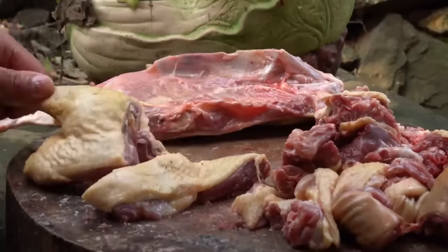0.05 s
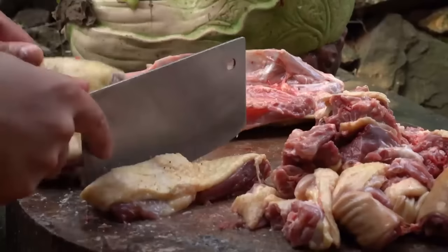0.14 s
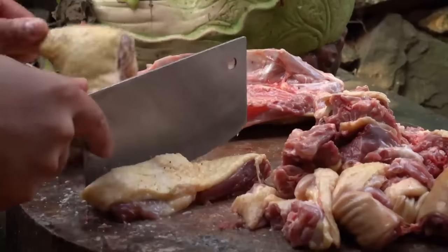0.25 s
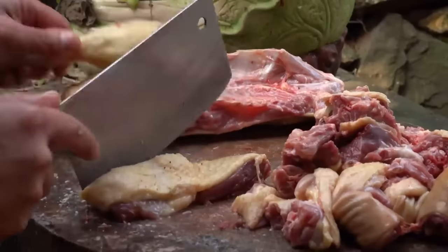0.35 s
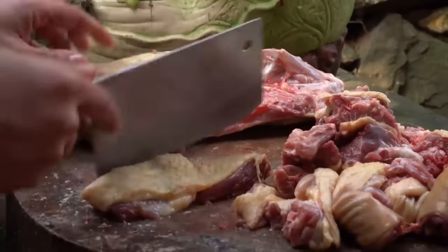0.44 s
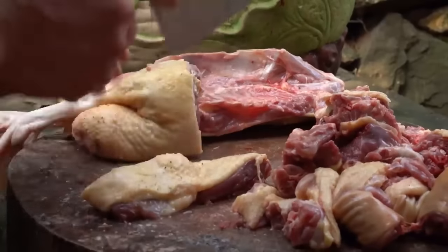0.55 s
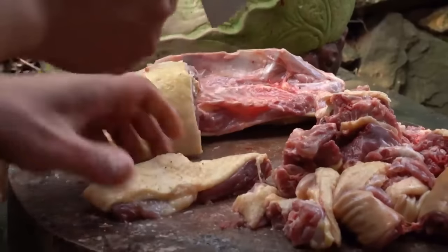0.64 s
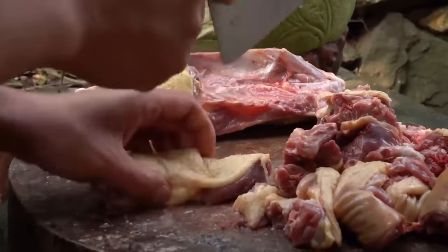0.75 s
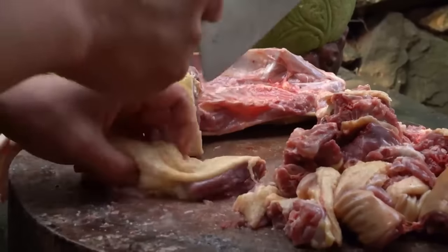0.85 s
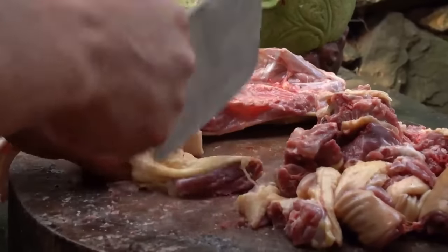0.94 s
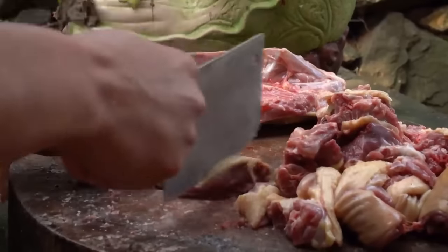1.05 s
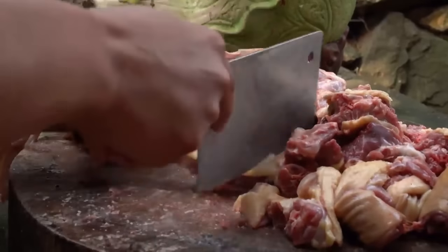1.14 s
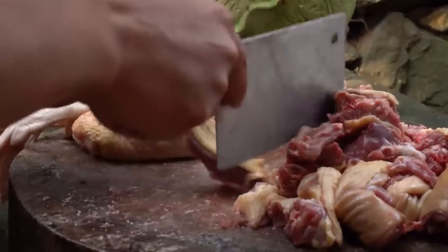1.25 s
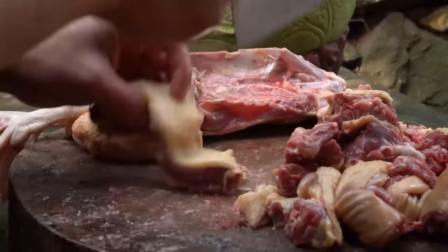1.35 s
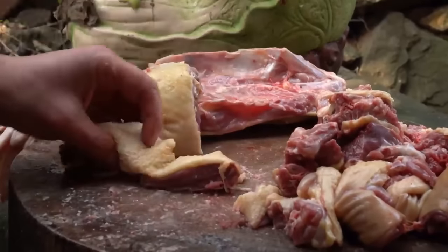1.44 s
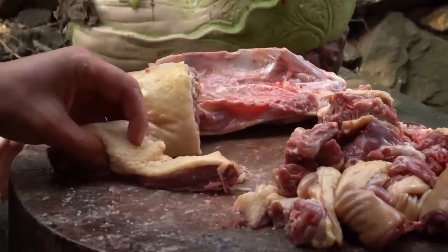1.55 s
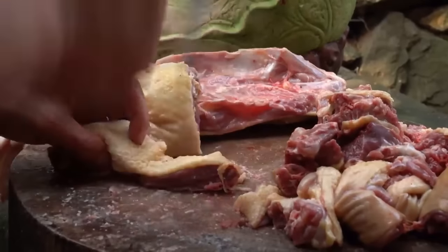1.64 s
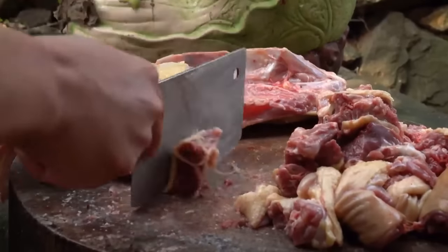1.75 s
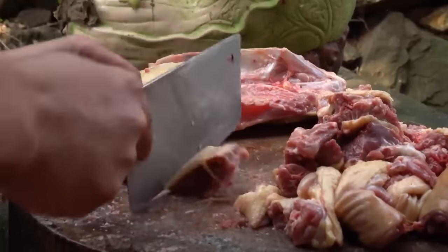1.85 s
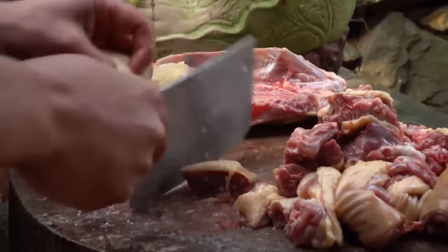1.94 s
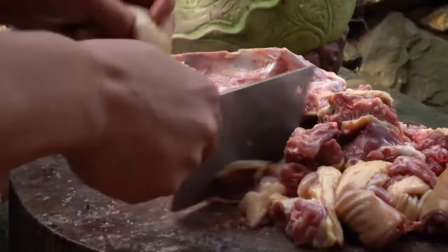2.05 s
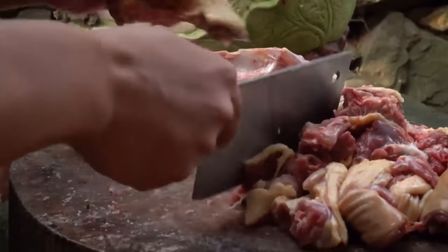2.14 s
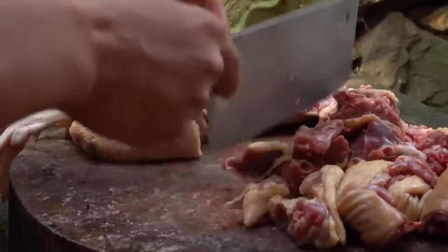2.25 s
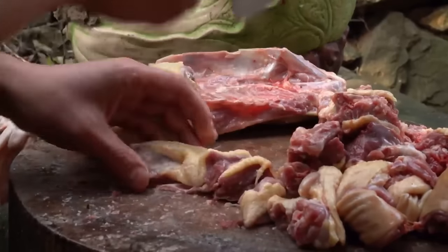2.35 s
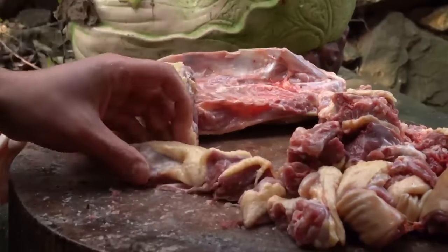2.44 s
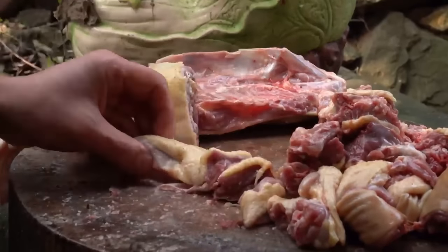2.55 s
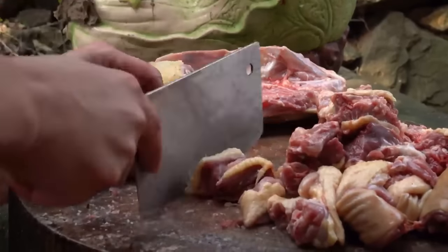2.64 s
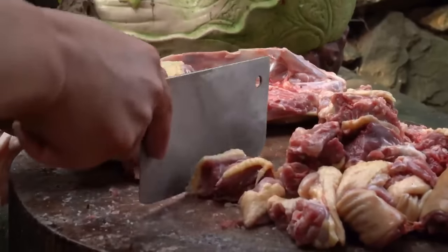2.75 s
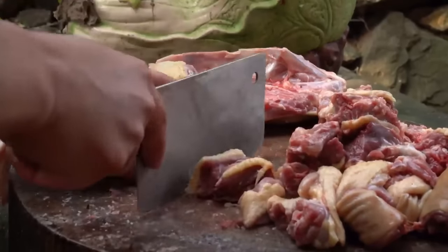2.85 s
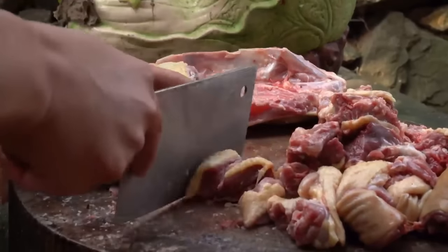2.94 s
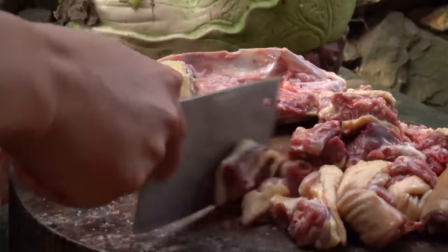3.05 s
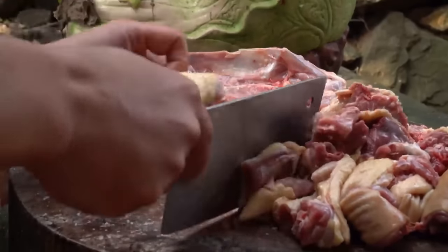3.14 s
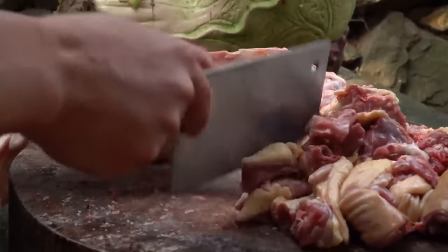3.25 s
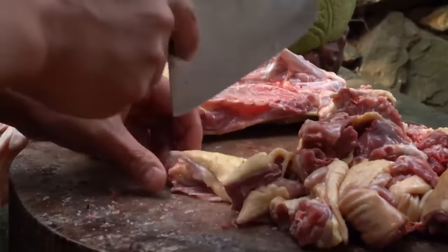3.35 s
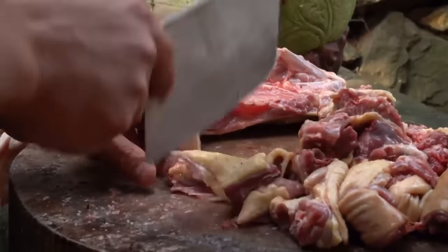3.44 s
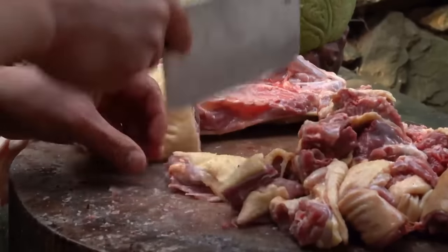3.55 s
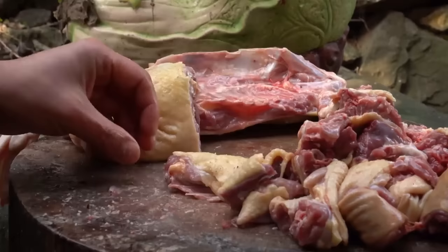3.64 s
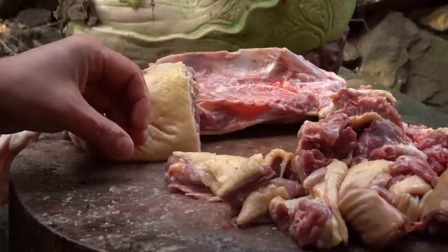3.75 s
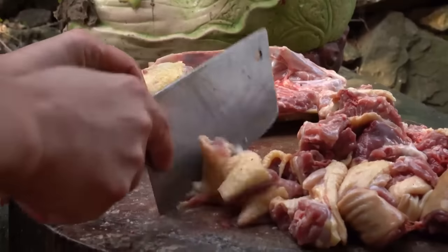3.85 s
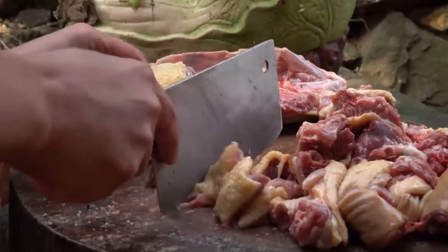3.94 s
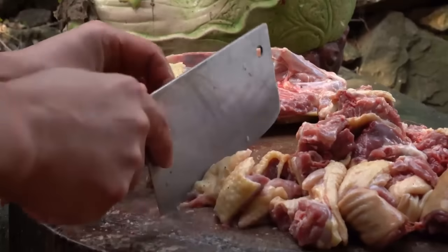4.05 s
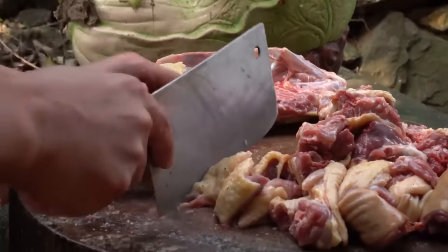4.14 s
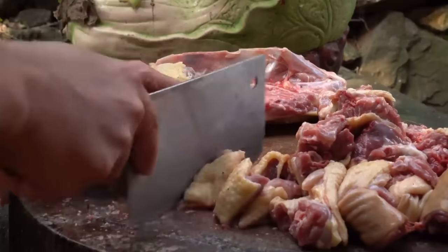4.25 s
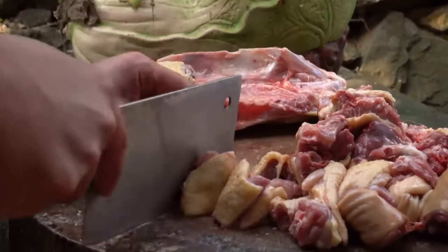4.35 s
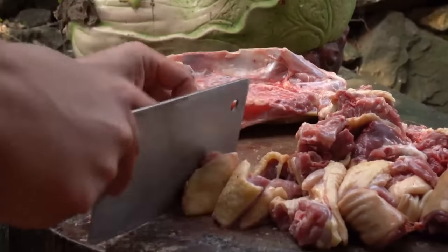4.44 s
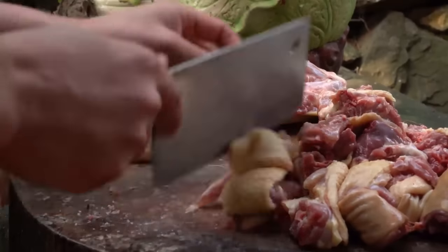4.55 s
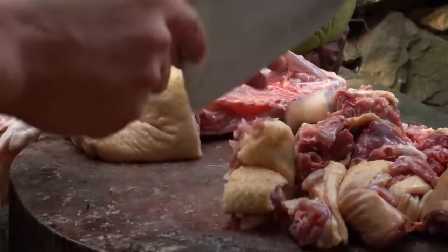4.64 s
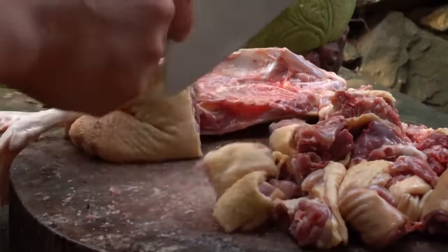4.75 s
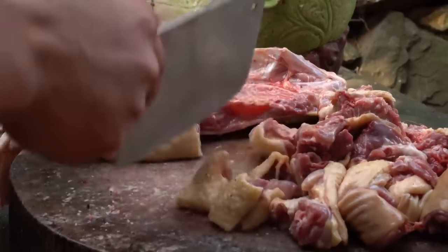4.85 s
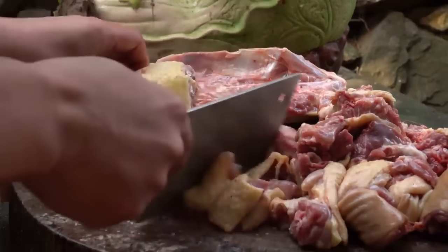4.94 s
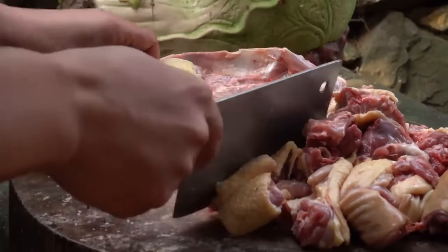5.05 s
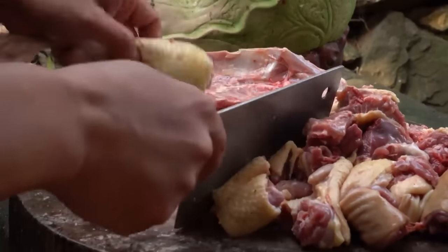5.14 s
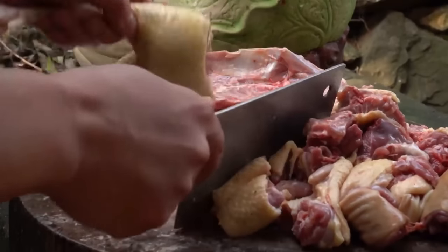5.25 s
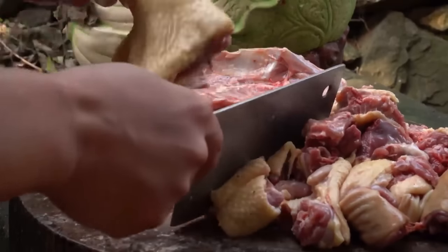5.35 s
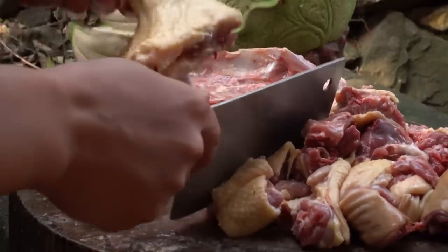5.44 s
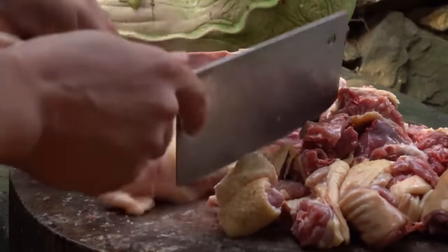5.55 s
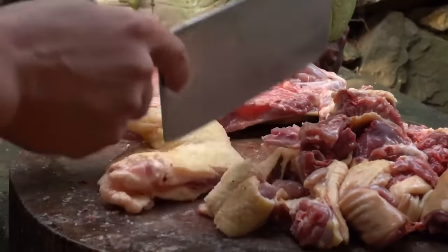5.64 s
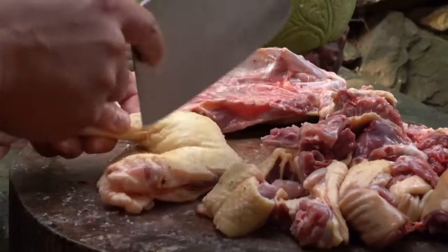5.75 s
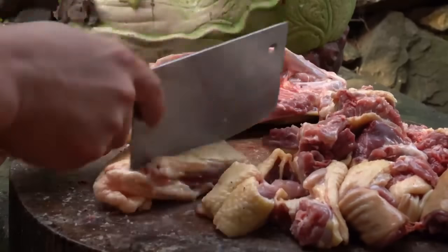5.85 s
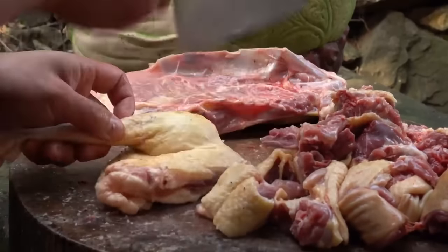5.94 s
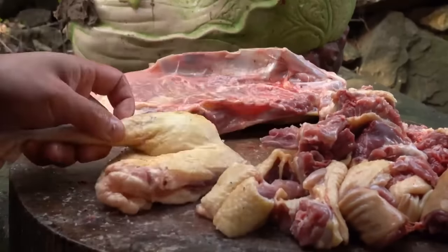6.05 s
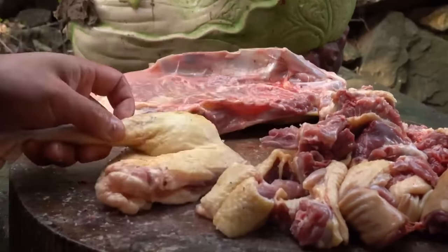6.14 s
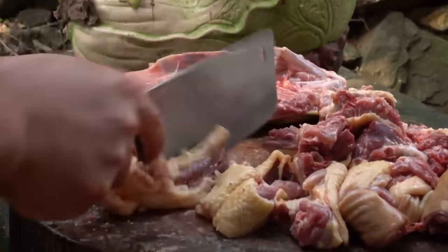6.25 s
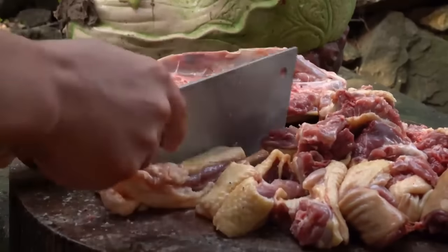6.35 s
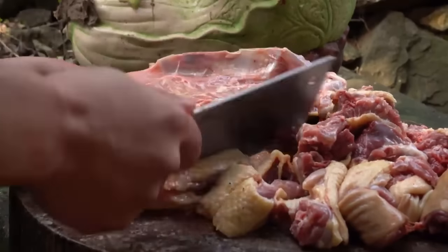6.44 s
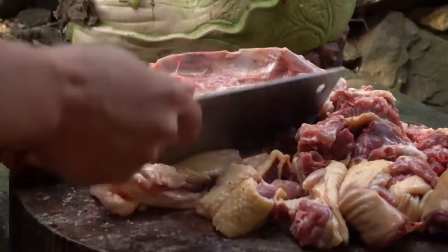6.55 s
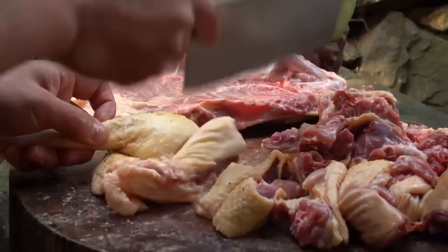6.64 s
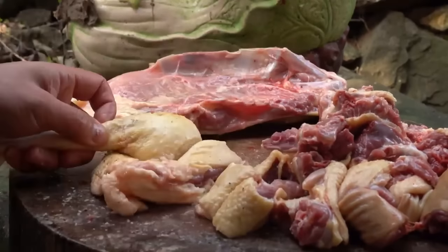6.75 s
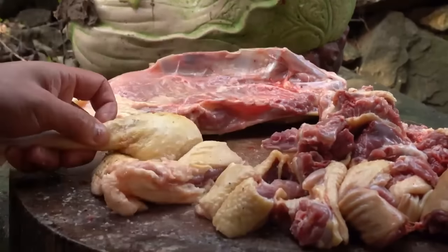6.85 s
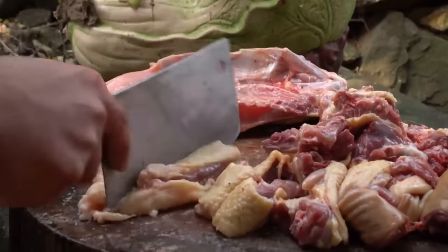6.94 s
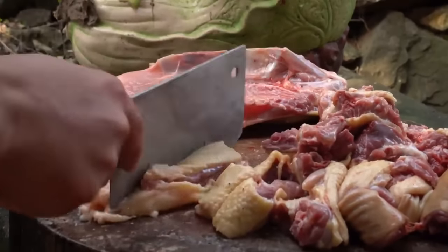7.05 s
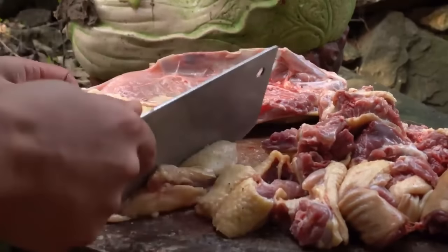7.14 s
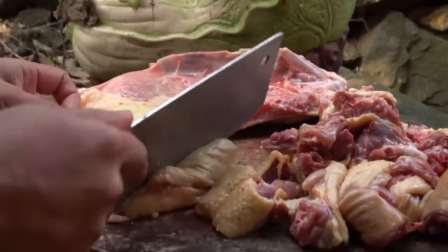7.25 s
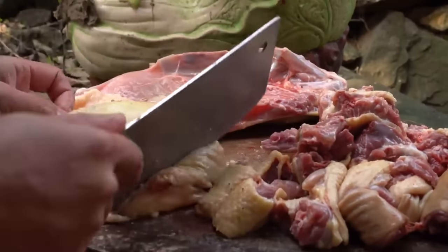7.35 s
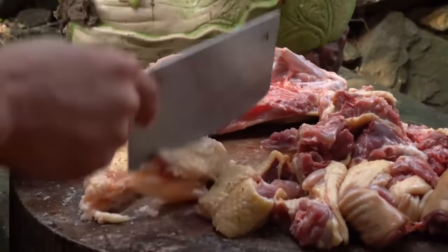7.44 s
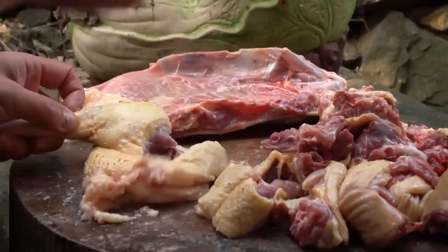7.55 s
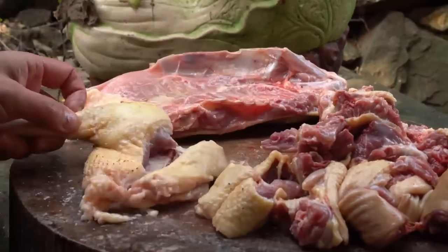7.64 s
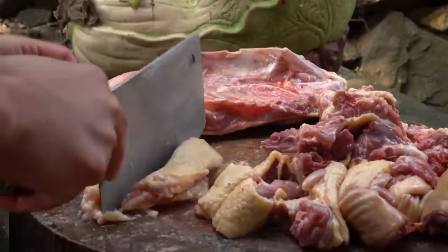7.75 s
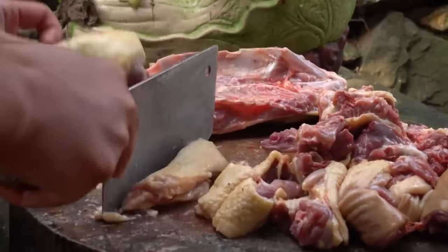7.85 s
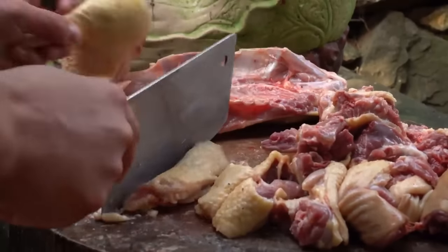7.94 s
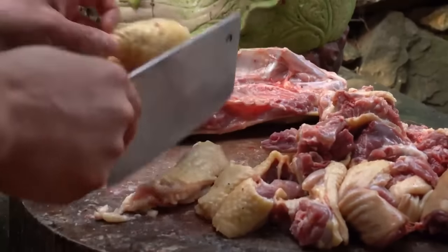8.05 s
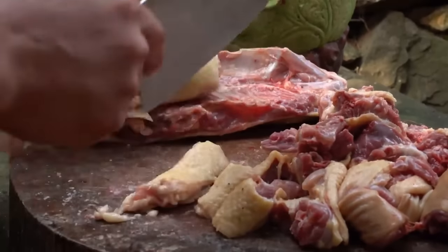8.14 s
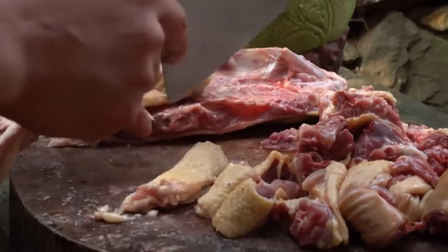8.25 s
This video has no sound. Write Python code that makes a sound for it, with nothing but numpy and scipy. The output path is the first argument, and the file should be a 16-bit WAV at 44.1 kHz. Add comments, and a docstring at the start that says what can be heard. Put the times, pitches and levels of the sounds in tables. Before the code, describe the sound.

Quiet open-air murmur and a thin wet sizzle lead into a bone-crunching cleaver chop at 0.2 s, the sizzle fading afterwards. A lighter squelching knock at 1.3 s leaves a faint metal ring. Hard chops land at 1.8 and 2.7 s, deep in the wooden block, the stuck blade singing around 1260 Hz for about half a second; a wet rasp at 2.1 s and a tiny squeak at 3.0 s fall between. Another crisp chop cracks at 3.9 s, then a wet slide at 4.4 s and a weak ticking hit at 5.0 s. Taps and squelches at 5.7 and 6.0 s precede chops at 6.35, 7.0 and 7.8 s, the 7.0 s one ringing brightest. Faint falling chirps appear near 1.5, 3.5, 4.1, 4.5, 6.5 and 8.2 s. Close stereo, slightly right, with short stone-wall echoes.

```python
"""Open-air murmur and a thin wet sizzle lead at once into the first chop of a heavy cleaver through a duck.
Bone fractures crunch as clusters of noise grains; the round wooden block thuds and hums in damped modes.
The blade sings sine notes; rasps, pops, squelches, ticks and low thumps are shaped noise or small resonances.
Stone walls answer with a scattered echo, faint chirps come by way of them, and a limiter flattens hard blows."""
import sys
import numpy as np
from scipy import signal
from scipy.fft import rfft, irfft, next_fast_len
from scipy.io import wavfile
from scipy.ndimage import uniform_filter1d, minimum_filter1d

SR = 44100
rng = np.random.default_rng(int(sys.argv[2]) if len(sys.argv) > 2 else 0)


def pcm_store(signal):
    """Save signal as 16-bit PCM."""
    levels = np.round(np.clip(np.atleast_2d(signal), -1, 1) * 32767)
    wavfile.write(sys.argv[1], SR, levels.astype(np.int16).T)


N = 366471
TIME = np.arange(N) / SR
AFTER = TIME[:SR]  # the second that follows a contact


def amp(db):
    """Decibels to gain."""
    return 10 ** (np.asarray(db) / 20)


def at_hz(points, hz):
    """Read a spectrum on a log-frequency axis."""
    point_hz, value = np.transpose(points)
    return np.interp(np.log(np.maximum(hz, 1)), np.log(point_hz), value)


def in_time(rows):
    """Gain of a level curve at every sample."""
    return amp(np.interp(TIME, *np.transpose(rows)))


def add(out, s, sound):
    """Mix a sound in at time s."""
    start = round(s * SR)
    n = min(sound.shape[-1], N - start)
    out[:, start:start + n] += sound[..., :n]


def burst(x, db):
    """Scale a short sound to the energy of 10 ms at this rms level."""
    energy = np.sum(np.atleast_2d(x) ** 2, axis=-1).mean()
    return x * amp(db) / np.sqrt(energy * 100 / SR)


def low_pass(x, hz, order=2):
    """Causal Butterworth low-pass."""
    return signal.sosfilt(signal.butter(order, min(hz, .45 * SR), fs=SR, output="sos"), x)


def high_pass(x, hz):
    """Causal Butterworth high-pass."""
    return signal.sosfilt(signal.butter(2, hz, "high", fs=SR, output="sos"), x)


def panned(x, db):
    """Lean a sound to the right: the right channel gains db against the left."""
    return x * amp([[-db / 2], [db / 2]])


def stereo_noise(n, colour, side_db, grain_db=0):
    """Noise of rms 1 with colour(Hz) in dB, in grains of uneven size; the two sides differ mostly in the treble."""
    size = next_fast_len(n)
    hz = np.arange(size // 2 + 1) * SR / size
    grain_sizes = np.clip(rng.standard_normal(size // 32 + 1), -2.5, 2.5)
    grains = amp(grain_db * np.repeat(grain_sizes, 32)[:size])
    spectra = rfft(rng.standard_normal((2, size)) * grains) * amp(colour(hz))
    side_gain = amp(side_db) * (hz + 100) / np.hypot(hz, 1100)
    mid, side = irfft(spectra * [np.ones_like(hz), side_gain], size)[:, :n]
    pair = np.array([mid + side, mid - side])
    return pair / pair.std()


def ring(hz, t60, delay=0, size=SR):
    """A struck mode: a sine that falls 60 dB in t60 seconds."""
    t = np.maximum(AFTER[:size] - delay, 0)
    return np.sin(2 * np.pi * hz * t) * amp(-60 * t / t60)


def crunch(colour, length, grain_db, side_db=-1):
    """A cluster of tiny fractures that swells quickly and dies away."""
    t = AFTER[:SR // 5] / length
    return stereo_noise(len(t), colour, side_db, grain_db) * t * np.exp(-1.6 * t)


def contact(db, centre_hz, octaves, length):
    """A short crunch around one broad resonance."""
    def colour(hz):
        return -30 * np.log10(1 + (np.log2((hz + 1) / centre_hz) / octaves) ** 2 / 3)
    return burst(crunch(colour, length, grain_db=2.5), db)


# murmur of the open air: (time [s], level [dB])
AIR_LEVEL = [(0, -53.5), (.7, -50.5), (1.1, -58), (3.6, -58), (5.4, -61), (7.0, -53.5), (8.31, -56.5)]
# its relative spectrum: (frequency [Hz], density [dB per Hz])
AIR_COLOUR = [(18, -75), (30, -33.5), (364, -10.5), (499, -10), (584, -7), (1250, -10), (1350, -7.5),
              (1500, -8.5), (1630, -11), (2290, -13), (2900, -16.5), (6550, -18.5), (16000, -24)]


def open_air():
    """A bed of wide, coloured noise that slowly rises and sinks."""
    return stereo_noise(N, lambda hz: at_hz(AIR_COLOUR, hz), side_db=1.0) * in_time(AIR_LEVEL)


# strength of the walls' answer: (frequency [Hz], level [dB])
YARD_COLOUR = [(60, -7), (150, -7.5), (300, -3), (600, -6), (1200, -6), (2500, -9), (6000, -4.5),
               (10000, -8), (16000, -3.5)]
# how long it lasts: (frequency [Hz], time to fall 60 dB [s])
YARD_T60 = [(60, 1), (200, 0.58), (500, 0.46), (1200, 0.38), (3000, 0.39), (7000, 0.34), (16000, 0.21)]


def yard(x, first_s=0.00162, build_s=0.0042):
    """Scattered reflections from rough walls build up, then die at a rate set by pitch, fastest in the top treble."""
    hz = np.arange(SR // 2 + 1.)
    white = rfft(stereo_noise(SR, np.zeros_like, side_db=-4.0))
    centres = 62.5 * 2 ** np.arange(0, 8.5, .5)  # half octaves
    onset = 1 - np.exp(-np.maximum(AFTER - first_s, 0) / build_s)
    echo = 0
    for centre, pick in zip(centres, np.eye(len(centres))):
        band = at_hz(np.transpose([centres, pick]), hz)
        decay = amp(-60 * AFTER / at_hz(YARD_T60, centre))
        tail = irfft(white * band, SR) * onset * decay
        # level the bands before the walls' colour
        level = np.sqrt(np.mean(band ** 2) * 2 / np.sum(tail ** 2))
        echo = echo + tail * amp(at_hz(YARD_COLOUR, centre)) * level
    return signal.fftconvolve(x, echo, axes=1)[:, :N]


# a chirp falls during the first share of its length, then holds its last note
CHIRP_START_HZ, CHIRP_END_HZ, CHIRP_FALL_SHARE = 3600, 2780, .6


def whistle(start_hz, end_hz, length, waver=0.025, start_waver=.06):
    """A short tone that starts rough and glides to its last note, where it wavers less."""
    progress = np.minimum(AFTER / length, 1)
    height = (1 + np.cos(np.pi * np.minimum(progress / CHIRP_FALL_SHARE, 1))) / 2
    chance = np.repeat(rng.standard_normal(SR // 50 + 1), 50)[:SR]
    hz = (end_hz + (start_hz - end_hz) * height) * (1 + (waver + start_waver * height) * chance)
    swell = np.sqrt(np.abs(np.sin(np.pi * progress)))
    return swell * np.sin(2 * np.pi * np.cumsum(hz) / SR)


# faint distant chirps, before the walls: (time [s], level [dB], length [s])
CHIRPS = [(1.49, -50, 0.14), (3.529, -49.5, .21), (4.099, -51, 0.27), (4.529, -43, .25), (6.499, -48.5, .1),
          (8.198, -44, 0.225)]
# the edge squeaks as it is pulled from the wood: one row of (time [s], level [dB], pitch [Hz], length [s])
SQUEAK = (3, -36, 1735, 0.02)


def chirps():
    """Unsteady sine tones: falling chirps, and one squeak around a level pitch."""
    out = np.zeros((2, N))
    for s, db, length in CHIRPS:
        add(out, s, amp(db) * whistle(CHIRP_START_HZ, CHIRP_END_HZ, length))
    s, db, hz, length = SQUEAK
    add(out, s, amp(db) * whistle(hz, hz, length))
    return out


def pops(per_s=650, pop_db=-3, spread_db=3, cycles=24, count=20, pan_db=3):
    """Tiny pockets of wet skin let go at random, each ringing for a few cycles at one of many pitches."""
    out = np.zeros((2, N))
    sizes = amp(spread_db * np.clip(rng.standard_normal(N), -2, 2))
    clicks = (rng.random(N) < per_s / SR) * sizes
    dealt = rng.integers(0, count, N)
    for k, hz in enumerate(np.geomspace(1700, 10000, count)):
        # the resonator falls 60 dB in the given number of cycles
        radius, angle = amp(-60 * hz / (cycles * SR)), 2 * np.pi * hz / SR
        poles = [1, -2 * radius * np.cos(angle), radius * radius]
        rings = signal.lfilter([np.sin(angle)], poles, clicks * (dealt == k) + 1e-18)
        out += panned(rings, db=pan_db * rng.standard_normal())
    out = high_pass(out, 620)
    return amp(pop_db) * out / out.std()


# a stroke lies this far below its top one rise before and one fall after it; a power over 1 rounds the top
STROKE_DEPTH_DB, STROKE_POWER = 22.5, 1.21


def pressure(strokes):
    """Gain of a set of strokes: each presses in, peaks and eases off."""
    power = 0
    for s, db, rise, fall in strokes:
        away = np.minimum(np.maximum((s - TIME) / rise, (TIME - s) / fall), 4)
        power = power + amp(db - STROKE_DEPTH_DB * away ** STROKE_POWER) ** 2
    return np.sqrt(power)


HANDLING_DB = -65.5  # fingers keep working the wet meat under and between the strokes
# strokes of blade or meat over the wet wood: (time at the firmest [s], level [dB], rise [s], fall [s])
SLIDES = [(0.3, -40.5, 0.26, 0.18), (0.55, -56, .2, .3), (0.87, -48.5, 0.13, 0.16), (1.22, -52.5, .2, .2),
          (2.13, -39.5, 0.037, 0.064), (2.2, -45.5, .06, .07), (3.04, -48.5, .14, 0.22),
          (3.15, -43, 0.11, .13), (3.88, -61, 0.13, 0.18), (4.405, -36.5, 0.13, .115),
          (4.6, -43, .075, .075), (5.075, -42.5, 0.057, 0.14), (5.24, -56, .15, 0.15),
          (5.57, -56, 0.059, .065), (5.68, -41.5, .04, .022), (6.79, -49.5, .085, .06),
          (7.81, -34, 0.0554, .04)]
# relative spectrum of the rasp: (frequency [Hz], density [dB per Hz])
SLIDE_COLOUR = [(120, -46), (200, -21.5), (590, -3.5), (806, -12), (1040, -2.5), (1350, -13.5),
                (1710, -7.5), (4600, -4), (5040, -7.5), (7270, -4), (16000, -19.5)]
# high sizzle as skin peels off the wet block: (time at the firmest [s], level [dB], rise [s], fall [s])
PEEL = [(0.36, -45.5, .36, 0.37)]
# relative spectrum of the sizzle: (frequency [Hz], density [dB per Hz])
PEEL_COLOUR = [(1000, -33), (5000, -8), (8500, 1.5), (13000, 2.5), (15000, -12.5)]


def slides(catches_per_s=70, catch_db=3.5):
    """The edge sticks and slips on the wet grain: a rasp in uneven clumps, with small wet pops and a sizzle."""
    rasp = stereo_noise(N, lambda hz: at_hz(SLIDE_COLOUR, hz), side_db=-2.0, grain_db=1.0)
    chance = np.clip(rng.standard_normal(4000), -2, 2)
    grip = amp(catch_db * np.interp(TIME * catches_per_s, np.arange(len(chance)), chance))
    rub = rasp * grip / np.sqrt(np.mean(grip ** 2)) + pops()
    rub_gain = np.hypot(pressure(SLIDES), amp(HANDLING_DB))
    peel = stereo_noise(N, lambda hz: at_hz(PEEL_COLOUR, hz), side_db=-1.5, grain_db=5.5)
    return panned(rub / rub.std() * rub_gain + peel * pressure(PEEL), db=1.5)


SQUELCH_HZ, SQUELCH_OCTAVES = 7100, 0.57  # wet skin always squelches in the same treble band
TICK_S, THUMP_OCTAVES = 0.0021, 0.49
# light cuts and taps of the blade through wet meat, levels before the contact cut-off: (time [s],
# knock level [dB], knock centre [Hz], knock width [octaves], squelch level [dB], contact cut-off [Hz], length [s])
TOUCHES = [(1.116, -36, 2970, 0.55, -47, 15000, .0057), (1.291, -19.5, 1540, 0.89, -20.5, 8400, 0.029),
           (2.129, -28, 1310, .7, -52, 12000, 0.0043), (2.407, -32, 1920, 1.14, -42.5, 14000, 0.0087),
           (3.127, -35.5, 1600, 0.97, -54, 12000, .011), (3.387, -42.5, 1300, 1.15, -52, 15100, 0.0072),
           (3.592, -48.5, 2200, 0.71, -51.5, 14000, 0.004), (4.567, -45, 1700, 1.1, -47, 14000, 0.0072),
           (4.725, -44.5, 1880, 1, -51, 14000, 0.016), (4.926, -55, 1890, 0.38, -66, 10000, .0055),
           (5.279, -51, 3000, .8, -55, 12000, .0046), (5.684, -22.5, 920, 0.43, -27, 15000, 0.0028),
           (5.923, -48.5, 3001, .8, -52, 14000, .015), (5.999, -35.5, 2000, 0.86, -30, 15000, .01),
           (6.01, -28, 1510, .6, -18, 15000, 0.0077), (6.577, -47, 3500, 0.77, -48, 10000, 0.011),
           (6.745, -48, 2500, .8, -46.5, 15000, 0.0118), (6.812, -38.5, 1160, 0.61, -45, 12000, 0.011),
           (7.265, -39.5, 3500, 0.79, -41, 11000, 0.021), (7.766, -28.5, 1970, 1.1, -33, 14000, .013)]
# short bright ticks and snaps, some within a blow or tap: (time [s], level [dB], centre [Hz], width [octaves])
TICKS = [(0.479, -50, 3500, 0.63), (0.912, -38, 7100, 0.19), (1.490, -36, 2450, 0.24),
         (1.491, -42.5, 7000, .8), (2.188, -35.5, 2950, 0.3), (3.176, -40.5, 3000, 0.59),
         (3.358, -50.5, 4200, .4), (4.634, -43.5, 5760, 0.31), (5.0211, -23.5, 1810, .15),
         (5.6846, -31, 3720, 0.17), (7.0068, -11, 2630, 0.22)]
# dull low thumps, alone or under a blow or touch: (time [s], level [dB], centre [Hz], length [s])
THUMPS = [(0.221, -18.5, 348, 0.0075), (2.109, -41.5, 650, 0.0053), (2.405, -45.5, 520, .005),
          (3.95, -35.5, 171, .025), (4.17, -45, 337, .009), (5.282, -52, 232, .01),
          (6.419, -35, 238, 0.055), (7.15, -36, 300, 0.01), (8.129, -42.5, 408, 0.03)]


def touches():
    """Light cuts knock and squelch at once; short bright ticks and dull low thumps join them or stand alone."""
    out = np.zeros((2, N))
    for s, knock_db, knock_hz, octaves, squelch_db, contact_hz, length in TOUCHES:
        knock = contact(knock_db, knock_hz, octaves, length)
        squelch = contact(squelch_db, SQUELCH_HZ, SQUELCH_OCTAVES, length)
        add(out, s, low_pass(knock + squelch, contact_hz, order=3))
    for s, db, hz, octaves in TICKS:
        add(out, s, contact(db, hz, octaves, TICK_S))
    for s, db, hz, length in THUMPS:
        add(out, s, contact(db, hz, THUMP_OCTAVES, length))
    return panned(out, db=2.0)


def blade_note(hz, t60, held, damping_db_per_s=230, swell_db=5, swell_s=0.081):
    """The blade's note starts a little held back, swells, and is damped fast once the held time is over."""
    swell = -swell_db * np.exp(-AFTER / swell_s)
    damping = -damping_db_per_s * np.maximum(AFTER - held, 0)
    return ring(hz, t60) * amp(swell + damping)


STUCK_HZ, STUCK_T60_S = 1259.7, 0.88  # the blade's note while its edge is stuck in the wood
# faint lasting hum of block and stand: (frequency [Hz], level against the blow's hum [dB], time to fall 60 dB [s])
HUM = [(295.2, -14, 0.31), (427.8, -23, 0.62), (521, -12.5, 0.3), (663.7, -14, 0.45), (805, -13.5, 0.514),
       (913, 3, 0.48), (1087, -17, 0.28), (1699, -5, 0.143)]
# the blade rings free after a glancing contact:
# (time [s], pitch [Hz], level [dB], time to fall 60 dB [s], time until a touch damps it [s])
RINGS = [(1.300, 1483, -44, 2.65, 0.43), (1.364, 3430, -31, 0.28, 0.12), (5.022, 990, -50.5, 1.1, 0.325),
         (5.685, 1490, -49.5, 5.3, 0.216)]


def ringing():
    """The block hums on after a blow; the blade sings one note when stuck in the wood and others when free."""
    out = np.zeros((2, N))
    for s, *_, hum_db, blade_db, held in CHOPS:
        for hz, db, t60 in HUM:
            add(out, s, amp(hum_db + db) * ring(hz, t60))
        add(out, s, amp(blade_db) * blade_note(STUCK_HZ, STUCK_T60_S, held))
    for s, hz, db, t60, held in RINGS:
        add(out, s, amp(db) * blade_note(hz, t60, held))
    return panned(out, db=6.0)


# the block's modes, damped at once by the buried edge, before each blow's scatter:
# (frequency [Hz], relative level [dB], time to fall 60 dB [s])
BLOCK_MODES = [(144.8, -31.5, 0.0865), (236.6, -26, 0.0314), (309.4, -13.5, 0.0655), (422.1, -13, 0.1033),
               (517.3, -3, 0.068), (650, -1.5, 0.056), (788, 1.5, 0.033), (989.5, 4, 0.028),
               (1155, -4, 0.04), (1439.5, 4, 0.012), (1700, 3, 0.0204), (2040, 4, 0.011),
               (2587, -6.5, 0.0188), (3300, -14, 0.039)]
# relative spectrum of the crushed fibres: (frequency [Hz], density [dB per Hz])
WOOD_COLOUR = [(40, -36), (90, -43), (200, -17), (320, -2.5), (600, 1.5), (1000, 3.5), (1800, -0.5),
               (3500, -12.5), (8000, -9)]


def thud(contact_hz, heel_s=.0035, heel_db=-2, settle_db=-6, scatter_db=0.82,
         fibre_db=1, fibre_s=0.0038, low_hz=150, path_s=.00009):
    """Tip and heel bite into the block and the edge settles; each contact strikes every mode anew."""
    # crushed fibres fill the gaps between the modes
    fibres = crunch(lambda hz: at_hz(WOOD_COLOUR, hz), fibre_s, grain_db=3, side_db=-2.0)
    modes = 0
    for bite, db in enumerate([0, heel_db, settle_db]):
        delay = heel_s * bite * rng.uniform(0.755, 1.26)
        for k, (hz, mode_db, t60) in enumerate(BLOCK_MODES):
            strength, detune, lag = rng.standard_normal(3)
            # each mode reaches the two microphones by its own paths
            arrival = delay + 0.000602 * abs(lag) + path_s * (2 + rng.standard_normal((2, 1)))
            mode = ring(hz * (1 + 0.05295 * detune), t60, arrival, size=fibres.shape[1])
            modes = modes + (-1) ** k * amp(db + mode_db + scatter_db * strength) * mode
    # the thud carries little deep bass
    body = burst(high_pass(modes, low_hz), 0)
    return low_pass(body + burst(fibres, fibre_db), contact_hz)


# blows: (time [s], thud level [dB], contact cut-off [Hz], bone crack level [dB], crack cut-off [Hz],
# crack lead [s], crack length [s], block hum level [dB], blade ring level [dB], time left in the wood [s])
CHOPS = [ (0.222, -9, 1950, -10.5, 14800, 0.00332, 0.00592, -22.5, -63, .2),
         (1.779, -3.5, 3350, -14.5, 7840, .0008, 0.0019, -32, -28.5, 0.463),
         (2.7287, -3.5, 2200, -15, 8400, 0.0021, .0021, -22, -29, 0.55),
         (3.9363, -7, 3480, -10, 15100, 0.0039, 0.0049, -25.5, -33.5, 0.37),
         (5.0214, -22, 2000, -39.5, 4030, 0, 0.00272, -48, -64.5, 0.245),
         (6.3490, -7.5, 1200, -18, 11540, .0095, 0.0067, -36, -30, 0.33),
         (7.0080, -4.5, 2610, -18.5, 9200, 0.00399, 0.0055, -15.5, -22.5, .75),
         (7.83, -5, 2370, -14, 6460, 0.00156, .005, -28.5, -30.5, .7)]
# relative spectrum of breaking bone: (frequency [Hz], density [dB per Hz])
BONE_COLOUR = [(200, -21.5), (900, -7), (2000, -3.5), (3400, -1), (4900, -8.5), (8000, -6), (11000, -9.5),
               (16000, -11)]


def chops(skin_db=-15, skin_lead_s=0.0056, splinter_db=-7, splinter_s=0.0074):
    """Skin parts, bone gives way at or just ahead of the thud in the wood, and splinters crackle with it."""
    wood, bone = np.zeros((2, 2, N))
    for s, thud_db, contact_hz, crack_db, crack_hz, lead, length, *_ in CHOPS:
        add(wood, s, burst(thud(contact_hz), thud_db))
        skin, crack, splinters = (skin_lead_s, length, skin_db), (lead, length, 0), (0, splinter_s, splinter_db)
        for early, lasts, db in [skin, crack, splinters]:
            fracture = crunch(lambda hz: at_hz(BONE_COLOUR, hz), lasts, grain_db=4.0)
            add(bone, s - early, burst(low_pass(fracture, crack_hz), crack_db + db))
    return panned(wood, db=4.0) + panned(bone, db=2.0)


def scene(light_echo_db=-2):
    """Work at the block, its echo and the open air; light contacts excite a slightly weaker echo."""
    heavy, light = chops(), touches() + slides()
    echo = yard(heavy + amp(light_echo_db) * light + chirps())
    return heavy + light + echo + ringing() + open_air()


def record(dry, ceiling_db=-3.0, release_db_per_s=210, ahead_s=0.0022, mono_below_hz=230, low_cut_hz=75):
    """Two close microphones share the bass; a look-ahead limiter ducks hard blows and lets tails swell back."""
    mid, side = (dry[0] + dry[1]) / 2, (dry[0] - dry[1]) / 2
    side = side - signal.sosfiltfilt(signal.butter(1, mono_below_hz, fs=SR, output="sos"), side)
    heard = np.array([mid + side, mid - side])
    peak_db = 20 * np.log10(np.abs(heard).max(axis=0) + 1e-9)
    over = np.maximum(peak_db - ceiling_db, 0)
    # the gain reduction jumps up with a peak, then lets go at a steady rate
    released = release_db_per_s * TIME
    held = np.maximum.accumulate(over + released) - released
    span = max(int(ahead_s * SR), 2)
    gain_db = uniform_filter1d(minimum_filter1d(-held, 2 * span), span)
    limited = high_pass(heard * amp(gain_db), low_cut_hz)
    # steep top cut at 15.8 kHz
    return signal.sosfilt(signal.ellip(10, .1, 80, 15800, fs=SR, output="sos"), limited)


dry = scene()
out = record(dry)
pcm_store(out)
```